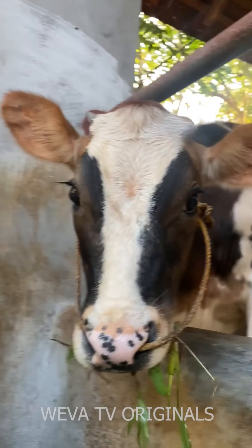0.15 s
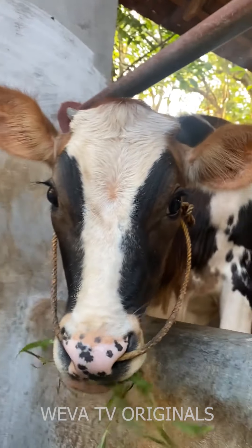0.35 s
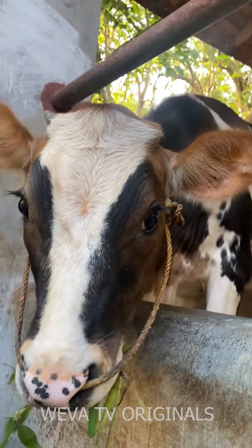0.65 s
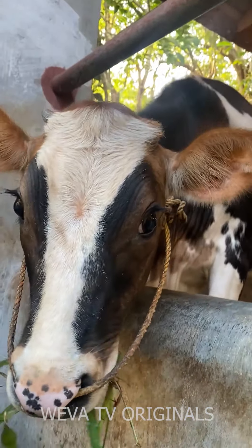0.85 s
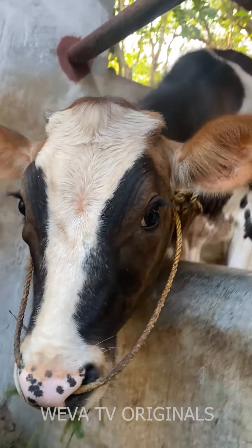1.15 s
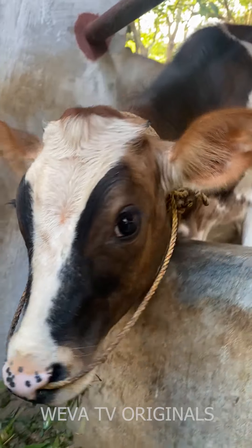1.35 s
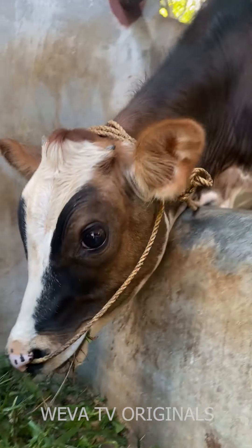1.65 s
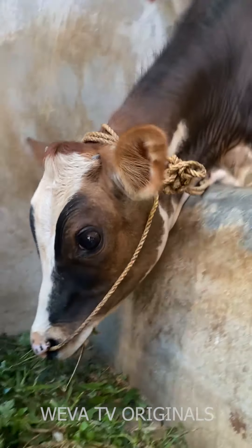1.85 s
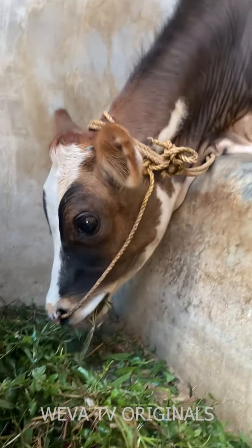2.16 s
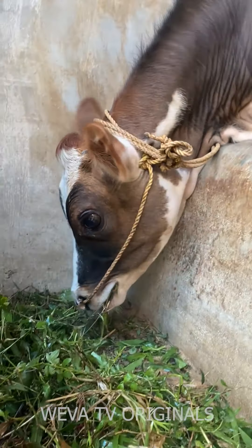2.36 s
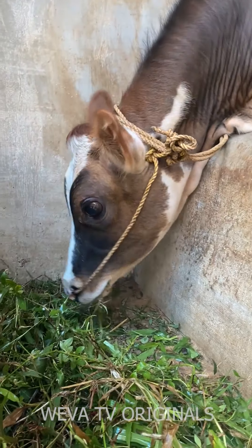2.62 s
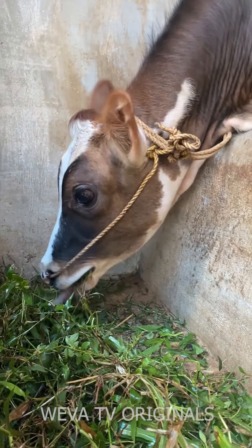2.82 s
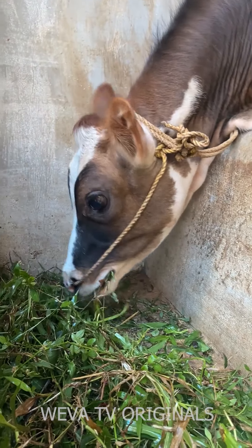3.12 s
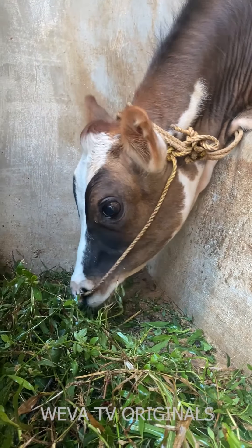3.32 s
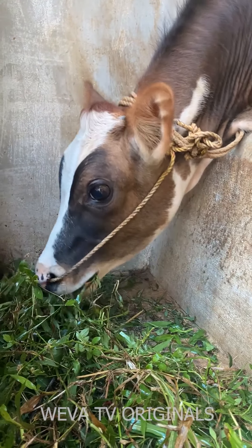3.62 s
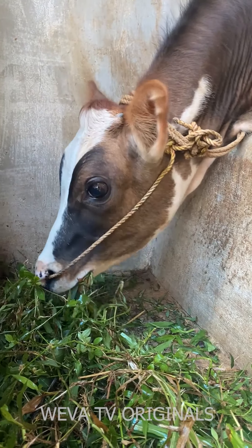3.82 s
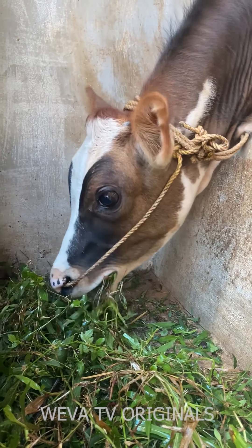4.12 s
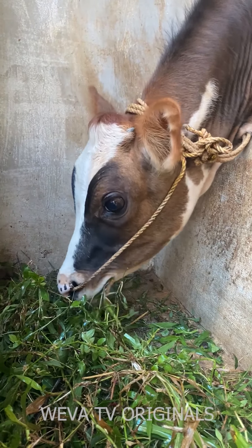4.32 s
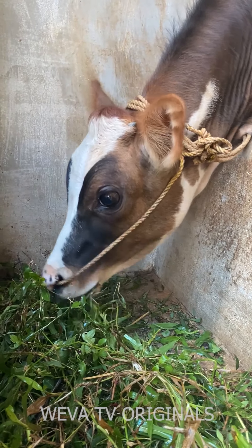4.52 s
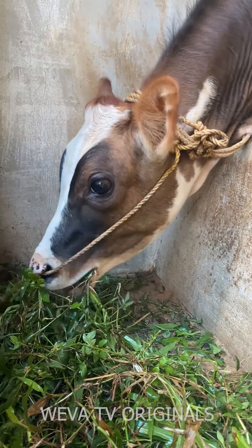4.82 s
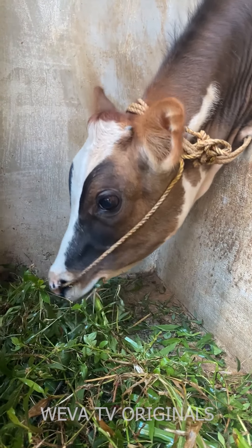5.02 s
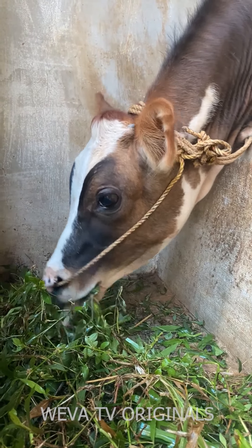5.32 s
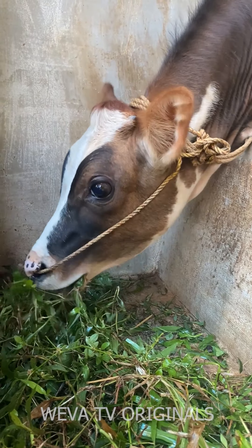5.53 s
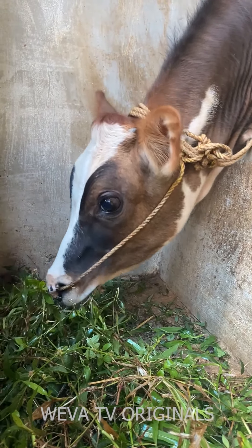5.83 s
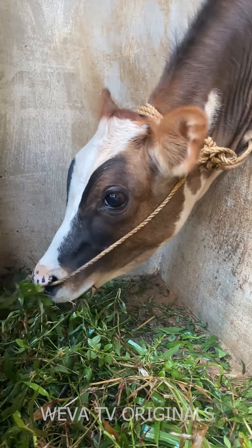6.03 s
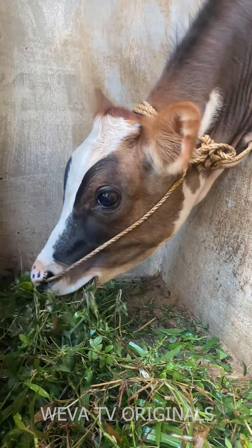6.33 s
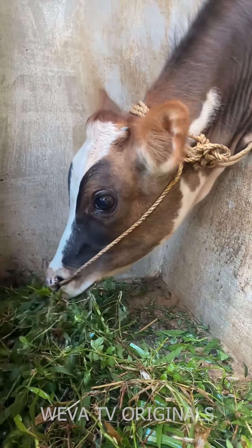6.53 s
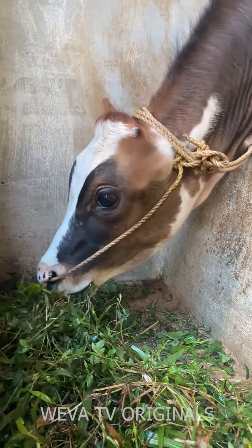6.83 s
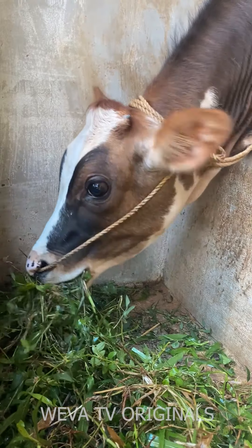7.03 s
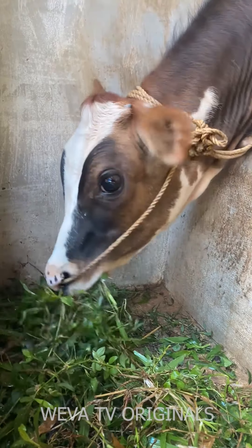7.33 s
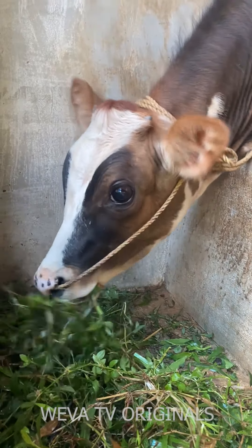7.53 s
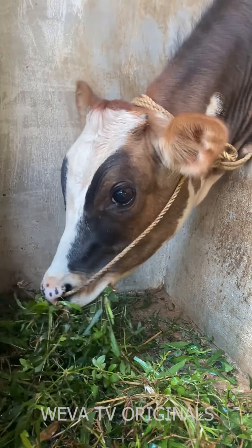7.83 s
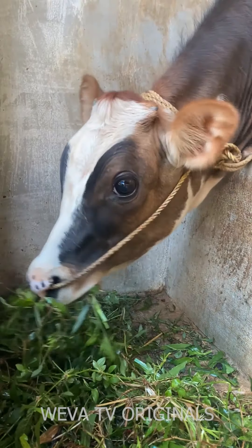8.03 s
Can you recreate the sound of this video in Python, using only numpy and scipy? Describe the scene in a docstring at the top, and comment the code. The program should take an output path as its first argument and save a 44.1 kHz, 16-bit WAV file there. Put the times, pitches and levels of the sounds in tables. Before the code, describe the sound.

A calf chews and tears fresh grass close by, rasping and crunching with small crackles over a low rumble that swells and fades.

```python
"""A calf grazing in a shed

A calf chews and tears fresh grass in a concrete corner. Breaking fibres excite the resonances of
its mouth and the trough, stalks snap, jaw and tongue knock, wet blades squeak and leaves rustle.
A far engine drones over a low rumble, swelling and fading; now and then something whistles faintly."""
import sys
import numpy as np
from scipy import signal
from scipy.fft import rfft, irfft
from scipy.io import wavfile
from scipy.ndimage import uniform_filter1d

SR = 44100
rng = np.random.default_rng(int(sys.argv[2]) if len(sys.argv) > 2 else 0)


def file_out(sig):
    """Save sig as 16-bit WAV at sys.argv[1]."""
    # one column per channel
    cols = np.atleast_2d(sig).T
    # limit, then scale
    lim = np.clip(cols, -1, 1)
    pcm = np.round(lim * 32767).astype(np.int16)
    wavfile.write(sys.argv[1], SR, pcm)


N = 359856
TIME = np.arange(N) / SR

# strokes of the jaw (start [s], length [s], grinding level [dB], tearing level [dB])
JAW_STROKES = [(0, 0.078, -39, -49.5), (0.08, 0.057, -44.5, -52), (0.372, 0.15, -54, -62),
               (0.597, 0.13, -42.5, -49), (0.956, 0.23, -52, -53.5), (1.189, 0.18, -49.5, -49),
               (1.42, 0.22, -51, -54), (1.711, 0.015, -39, -52), (1.764, 0.13, -41, -51),
               (2.007, 0.3, -45.5, -57.5), (2.292, 0.054, -38.5, -66), (2.389, 0.15, -44, -51.5),
               (2.571, 0.08, -47.5, -54), (2.707, 0.055, -51, -59), (2.784, 0.05, -42.5, -64),
               (2.979, 0.16, -45.5, -52), (3.176, 0.15, -42.5, -49.5), (3.393, 0.077, -44.5, -54),
               (3.526, 0.24, -57.5, -62), (3.693, .2, -55, -57), (3.98, 0.051, -57, -54),
               (4.078, 0.11, -48.5, -52), (4.227, 0.22, -38.5, -50.5), (4.487, 0.046, -46, -47.5),
               (4.571, 0.049, -47.5, -51.5), (4.688, 0.16, -45, -56.5), (4.975, 0.17, -41, -53.5),
               (5.243, 0.087, -45, -56), (5.287, 0.062, -44, -66), (5.413, 0.07, -47.5, -65),
               (5.518, 0.17, -56, -61), (5.763, 0.059, -50.5, -78), (5.88, 0.1, -52.5, -56),
               (5.983, 0.26, -55, -55), (6.248, 0.25, -47.5, -50), (6.495, 0.093, -48, -56),
               (6.664, 0.48, -51, -51), (7.177, 0.13, -48.5, -47.5), (7.454, 0.16, -54.5, -52),
               (7.617, 0.17, -47.5, -51), (7.82, 0.15, -46, -49), (8.101, 0.082, -47, -43)]
# spectrum of tearing grass (frequency [Hz], level [dB])
TEAR_SPECTRUM = [(250, -23), (700, -1), (1000, 4), (1350, 1.5), (1900, -0.5), (2500, -0.5), (3300, -2.5),
                 (4300, -5), (6000, -2.5), (9000, -29.5), (15000, -36)]

def chewing(grind_db=-2.34, tear_db=-1.5):
    """Fracture noise: fibres break in clumps under each stroke, ground in the jaws and torn apart."""
    clumps = wander(hz=43.3)
    shared_breaks = fibres(per_s=260, spread_db=2.0)
    crushed = (fibres(per_s=2000, spread_db=1.5) + 0.25 * shared_breaks) * amp(0.84 * clumps)
    torn = (fibres(per_s=2600, spread_db=2.5) + 0.5 * shared_breaks) * amp(1.9 * clumps)
    shape = dict(attack_s=0.018, swell_db=3.5, release_db_per_s=237)
    grinding = strokes([(s, length_s, db) for s, length_s, db, _ in JAW_STROKES], **shape, rest_db=-60.5)
    tearing = strokes([(s, length_s, db) for s, length_s, _, db in JAW_STROKES], **shape, rest_db=-63)
    grind = amp(grind_db) * grinding * cavities(crushed)
    tear = amp(tear_db) * tearing * unit(colour(torn, TEAR_SPECTRUM))
    return grind + tear


# fixed modes of mouth and trough (frequency [Hz], bandwidth [Hz], gain [dB])
CAVITY_MODES = [(330, 16.4, 7.5), (422, 170, -8.5), (494.4, 8.7, 3), (551, 21, -1), (599, 8.5, 3),
                (638, 10.5, 3), (860, 350, -12), (1260, 32, -36)]
# resonance of the mouth as the jaw moves (time [s], frequency [Hz])
MOUTH_RESONANCE = [(.07, 403), (.5, 547), (.72, 447), (1.0, 318), (1.75, 398), (1.9, 390), (2.12, 460),
                   (2.3, 564), (2.37, 417), (2.52, 367), (2.82, 506), (3.2, 487), (3.42, 594), (4.3, 380),
                   (4.45, 420), (4.75, 580), (5.05, 453), (5.28, 510), (5.45, 344), (6.4, 373), (7.25, 520),
                   (8.16, 486)]
# spectrum of dull grinding (frequency [Hz], level [dB])
GRIND_SPECTRUM = [(100, -37), (200, 1), (330, -1), (600, 4.5), (760, -9), (1300, -1), (2500, -75.5)]

def cavities(crushed, dull=0.72, mouth=0.52, width_hz=297):
    """Cavity resonance: the crunch excites fixed modes and one that follows the opening of the jaw."""
    ring = sum(amp(db) * mode(crushed, hz, width) for hz, width, db in CAVITY_MODES)
    mouth_hz = curve(MOUTH_RESONANCE)
    formant = resonate(resonate(crushed, mouth_hz, width_hz), mouth_hz, width_hz)
    return unit(unit(ring) + dull * unit(colour(crushed, GRIND_SPECTRUM)) + mouth * unit(formant))


# breaking stalks (time [s], level [dB], relative body [dB], relative edge [dB], ring frequency [Hz])
STALK_SNAPS = [(0.0187, -29, -18, -12, 1410), (.043, -32, -19, -22, 1260), (0.068, -33.5, 2.5, -22, 960),
               (0.114, -26, -24, -1.5, 1380), (.14, -23, -12.5, -12.5, 980), (.495, -38, 5.5, -24, 1390),
               (0.601, -32.5, -24, -20, 1730), (0.636, -32.5, -34, -20, 1350),
               (0.656, -30.5, -29, -19, 1400), (.752, -24.5, -17, -14, 1170), (0.8041, -21, -8, -18, 2180),
               (1.0045, -31, -5, -14, 5600), (1.0905, -34, -28, -25, 2310), (1.2434, -29.5, -3, -5.5, 1250),
               (1.2891, -18, -9.5, -16, 1040), (1.322, -35, -3, 8, 5600), (1.624, -31, -32, -12, 1230),
               (1.732, -35, -24, -19, 1310), (1.886, -29, -19, -16, 2380), (1.994, -45.5, -10, 5.5, 5500),
               (2.129, -36, -2, -22, 2190), (2.17, -34, -11, -24, 2140), (2.24, -31, -11, -9, 1200),
               (2.338, -32, -7, -16, 1200), (2.5, -31, 0, -26, 1520), (2.518, -24, -8, -18, 2600),
               (2.7332, -33, -12, -20, 1160), (3.0076, -34, -11, -7, 1200), (3.222, -30.5, -7, -16, 3500),
               (3.258, -28.5, -7, -19, 3400), (3.3009, -20, -9.5, -12, 4280), (3.3065, -27, -9, -19, 3930),
               (3.338, -30, -10, -12, 4400), (3.8053, -47, -15, 2, 5400), (4.278, -28, -4.5, -28, 4200),
               (4.2946, -26.5, -5, -24, 4140), (4.316, -30, 1.5, -22, 4370), (4.3365, -25, -3, -17, 3600),
               (4.346, -27, -13, -18, 1500), (4.375, -21, -11, -7.5, 4350), (4.407, -24, -9, -22, 4200),
               (4.415, -22.5, -8, -7, 4250), (4.4188, -28, -8, -27, 1500), (4.627, -36, -14, -18, 1000),
               (5.023, -33, -4, -24, 1010), (5.0451, -26.5, -9, -26, 4100), (5.0795, -27.5, -9, -12, 2200),
               (5.092, -35, 3, -20, 2600), (5.111, -27.5, -9, -13, 4760), (5.145, -40, 0, -22, 900),
               (5.165, -39, 6, -5, 800), (5.373, -43, -6, -24, 950), (4.5102, -34.5, 4, -13, 1900),
               (5.685, -30.5, -6, -11, 3950), (6.011, -31, -25, -20, 980), (6.4507, -28.5, -19, -14, 1510),
               (6.5803, -31.5, -2, -19, 2560), (7.006, -38.5, -6, 9, 5470), (7.1237, -45, -20, 13.5, 5400),
               (7.253, -23.5, -6.5, -22, 1560), (7.3036, -24.5, -9, -14, 1820),
               (7.428, -30, -24, -17, 1470), (7.514, -45, -13, 11.5, 5400), (7.9495, -17.5, -12, -15, 2380),
               (7.9549, -20.5, -5, -14, 1150)]
# spectra of the crack and of its hollow body (frequency [Hz], level [dB])
CRACK_SPECTRUM = [(200, -32.5), (800, 5.5), (1150, 13), (1600, 3.5), (2400, -3.5), (3200, -1), (4000, 2),
                  (4800, -3), (6000, -2.5), (7500, 3.5), (10000, -45), (15000, -40)]
BODY_SPECTRUM = [(100, -54), (220, 0.5), (350, 4.5), (600, 6), (780, -3), (1300, 1.5), (2500, -52)]

def snaps(split_s=0.004, width_hz=950, crack_db=9.5, stalk_db=4.5, body_db=17, edge_db=16):
    """Brittle fracture: a crack and its splinters ring the stalk, with a hollow body and crisp edge."""
    crack, stalk, body, edge = np.zeros((4, N))
    for s, db, body_rel_db, edge_rel_db, hz in STALK_SNAPS:
        splinters = scatter(split_s)
        splinters *= rng.random(len(splinters)) < 0.17  # thinned to a sparse run
        splinters /= np.linalg.norm(splinters)
        splinters[0] = 0.25  # the first crack
        ring = mode(mode(splinters, hz, width_hz), hz, width_hz)
        add(crack, s, splinters * amp(db))
        add(stalk, s, ring / np.linalg.norm(ring) * amp(db + stalk_db))
        add(body, s, splinters * amp(db + body_rel_db))
        add(edge, s, splinters * amp(db + edge_rel_db))
    return (amp(crack_db) * colour(crack, CRACK_SPECTRUM) + stalk
            + amp(body_db) * colour(body, BODY_SPECTRUM)
            + amp(edge_db) * colour(edge, RUSTLE_SPECTRUM))


# knocks of jaw and tongue (time [s], level [dB], frequency [Hz])
JAW_KNOCKS = [(.069, -21, 344), (.125, -25, 254), (.496, -28, 550), (.69, -33, 331), (.804, -33.5, 487),
              (.985, -27, 270), (1.721, -22.5, 434), (1.726, -26.5, 328), (1.788, -21.5, 383),
              (1.885, -32, 425), (2.127, -40, 530), (2.2965, -21.5, 611), (2.308, -21.5, 558),
              (2.345, -27, 427), (2.501, -23.5, 322), (2.808, -27.5, 581), (2.835, -35, 480),
              (3.303, -22, 632), (3.437, -26, 610), (4.316, -24.5, 330), (4.325, -23, 435),
              (4.34, -44, 710), (4.395, -21, 324), (4.722, -29, 496), (4.73, -29, 893), (4.773, -27, 506),
              (5.002, -25.5, 331), (5.255, -24.5, 510), (5.268, -26.5, 576), (5.28, -25, 436),
              (6.012, -28.5, 611), (7.251, -28, 643)]

def knocks():
    """Impact excitation: each knock of jaw or tongue rings one hollow, damped mode."""
    return damped_tones(JAW_KNOCKS, rise_s=0.0062, gain_db=-14)


# sliding blades (start [s], level [dB], top frequency [Hz], length [s], bandwidth [Hz])
BLADE_SQUEAKS = [(.018, -42.5, 1370, 0.0094, 393), (.905, -60, 3300, 0.045, 2510),
                 (1.003, -52.5, 5050, 0.034, 2500), (1.08, -51.5, 2200, 0.059, 1100),
                 (1.301, -41.5, 3255, 0.013, 170), (2.1, -63, 2200, 0.2, 1300),
                 (4.1, -57, 2360, 0.065, 1300), (4.23, -59, 4300, 0.18, 700)]

def squeaks():
    """Stick-slip friction: wet blades slide in tiny jerks that drive a resonance."""
    slips = fibres(per_s=1200, spread_db=6.0)
    return glides(BLADE_SQUEAKS, slips, bend=0.026, gain_db=2)


# nudges of the muzzle (start [s], length [s], level [dB])
MUZZLE_NUDGES = [(0.27, 0.058, -52.5), (.41, 0.11, -55.5), (0.615, 0.13, -56), (.89, 0.038, -54),
                 (0.995, 0.016, -48), (1.13, 0.097, -56), (1.228, 0.087, -45.5), (1.42, 0.12, -64),
                 (1.572, 0.084, -55), (1.761, 0.15, -55.5), (2.064, 0.19, -55), (2.21, 0.039, -49.5),
                 (2.362, 0.17, -52), (2.696, 0.27, -55), (2.995, 0.24, -48), (3.42, .04, -51),
                 (3.472, 0.12, -44), (3.612, 0.25, -44.5), (3.963, 0.062, -49), (4.084, 0.062, -41),
                 (4.206, 0.22, -50), (4.485, 0.03, -46.5), (4.59, 0.15, -46), (4.868, 0.053, -49),
                 (5.009, 0.09, -49), (5.3, 0.094, -51), (5.418, 0.074, -42.5), (5.582, 0.13, -45),
                 (5.91, 0.042, -48.5), (6.018, 0.29, -43.5), (6.327, 0.27, -44), (6.675, 0.21, -46),
                 (6.887, 0.15, -40.5), (7.203, 0.31, -46.5), (7.461, 0.038, -42.5), (7.547, 0.077, -40),
                 (7.721, 0.22, -47), (8.051, 0.11, -46)]
# spectrum of rustling leaves and of a snap's crisp edge (frequency [Hz], level [dB])
RUSTLE_SPECTRUM = [(600, -25), (2000, -9), (4000, -3.5), (5700, 0), (8500, 0), (10500, -1.5), (13000, -2.5),
                   (15000, -3)]

def leaves(gain_db=-4.5, flicker_db=1.34):
    """Friction noise: nudged leaves scrape on each other, heard from the front and from around."""
    nudging = strokes(MUZZLE_NUDGES, attack_s=0.009, swell_db=4.5, release_db_per_s=129, rest_db=-64)
    level = nudging * amp(gain_db + flicker_db * wander(hz=45))
    scrapes = [colour(fibres(per_s=4000, spread_db=1.0), RUSTLE_SPECTRUM) for _ in range(2)]
    return [level * leaf_patches(x) for x in scrapes]


def leaf_patches(x, depth_db=3.0, size=512):
    """Spectral modulation: different leaves sound in turn, as brief patches of colour."""
    frames = dict(nperseg=size, noverlap=size * 3 // 4)
    spectra = signal.stft(x, **frames)[2]
    patches = uniform_filter1d(rng.standard_normal(spectra.shape), size=9, axis=0)  # across frequency
    patches = uniform_filter1d(patches, size=12, axis=1)  # across time
    return unit(signal.istft(spectra * amp(depth_db * unit(patches)), **frames)[1][:N])


# soft low bumps (time [s], level [dB], frequency [Hz])
LOW_BUMPS = [(.825, -12, 81), (1.505, -17, 86.4), (1.72, -12, 94), (4.485, -11.5, 116.5),
             (4.835, -13.5, 158), (4.851, -7.5, 111), (5.47, -14, 110)]

def bumps():
    """Damped oscillation: low tones with a gentle onset, heard as soft bumps."""
    return damped_tones(LOW_BUMPS, rise_s=0.013, gain_db=-20.5)


# faint whistles (start [s], level [dB], top frequency [Hz], length [s], bandwidth [Hz])
FAINT_WHISTLES = [(.24, -56.5, 1420, 0.42, 550), (.85, -56, 1470, 0.36, 190), (2.28, -56, 1450, 0.37, 170),
                  (2.78, -61.5, 1503, 0.32, 50), (3.39, -56, 1433, .26, 70), (4.06, -55.5, 1490, 0.22, 120),
                  (4.62, -57, 1590, 0.3, 149), (5.79, -58.5, 1468, 0.235, 45), (6.33, -58, 1540, 0.31, 185),
                  (7.53, -64, 1740, 0.3, 260)]

def whistles():
    """Narrow-band noise: a gliding resonance turns hiss into a hoarse whistle."""
    return glides(FAINT_WHISTLES, rng.standard_normal(N), bend=0.14, gain_db=-2.8)


# the engine speeds up, then slows (time [s], firing rate [Hz])
FIRING_RATE = [(0, 15.2), (.9, 15.4), (1.7, 16.1), (2.3, 16.4), (2.7, 16.25), (3.4, 16.4), (3.8, 16.8),
               (4.7, 16.75), (5.5, 16.55), (5.9, 16.45), (6.25, 15.6), (6.6, 15.3), (7.0, 14.8),
               (7.5, 14.3), (8.16, 14.1)]
# swells of its partials (crest time [s], Gaussian width [s], multiple of firing rate [1], level [dB])
ENGINE_PARTIALS = [(1.8, 1.5, 2.5, -51), (5.6, 0.34, 3, -48), (4.7, .5, 4, -52), (8.4, 0.31, 4, -49),
                   (0.63, 0.89, 5, -49.5), (4.65, 0.82, 5, -42), (6.02, 1.67, 5, -44.5),
                   (0.89, 0.19, 6, -42.5), (1.67, 0.54, 6, -44.5), (5.2, 0.48, 7, -50.5),
                   (6.73, 0.47, 7, -43), (3.08, 0.65, 8, -48), (5.02, 0.89, 8, -41.5), (6.38, 0.58, 8, -44),
                   (4.2, 0.61, 10, -49), (5.02, 0.22, 11, -48)]

def engine(waver=0.0043, flutter_db=1.0):
    """Periodic excitation: a far engine drones at multiples of its firing rate, which swell in turn."""
    firings = np.cumsum(curve(FIRING_RATE) * (1 + waver * wander(hz=5.6))) / SR
    out = np.zeros(N)
    for s, width_s, multiple, db in ENGINE_PARTIALS:
        swell = amp(db) * np.exp(-((TIME - s) / width_s) ** 2 / 2)
        out += swell * np.sin(2 * np.pi * multiple * firings + rng.uniform(0, 2 * np.pi))
    return out * amp(flutter_db * wander(hz=2.6))


# swell of far traffic (time [s], level [dB])
TRAFFIC_LEVEL = [(0.0, -46.5), (0.2, -47), (0.5, -47.5), (0.82, -46), (1.61, -46.5), (1.75, -39.5),
                 (1.95, -51.5), (2.11, -43), (2.7, -45), (3.43, -46.5), (4.41, -42), (4.52, -36),
                 (4.57, -41), (4.84, -40.5), (5.29, -46.5), (6.3, -46), (7.11, -45), (7.18, -49.5),
                 (8.16, -45)]
# spectra of the traffic and of the deep bed (frequency [Hz], level [dB])
TRAFFIC_SPECTRUM = [(25, -15.5), (45, -16), (62, -0.5), (82, 0.5), (105, 0), (135, -2), (155, -11),
                    (185, -8), (220, -17.5), (300, -33), (600, -49), (3000, -93)]
DEEP_SPECTRUM = [(12, -36), (25, -8), (36, -6), (48, 3.5), (62, -12.5), (100, -16.5), (300, -41),
                 (2000, -90)]

def rumble(deep_db=-55):
    """Low-frequency noise: the roar of far traffic rises and falls over a steady deep bed."""
    roar = unit(colour(rng.standard_normal(N), TRAFFIC_SPECTRUM, size=16384))
    deep = unit(colour(rng.standard_normal(N), DEEP_SPECTRUM, size=16384))
    return roar * amp(curve(TRAFFIC_LEVEL)) + deep * amp(deep_db)


# spectrum of the yard's air (frequency [Hz], level [dB])
AIR_SPECTRUM = [(60, 6.5), (300, 6.5), (600, 3.5), (1300, 2.5), (2200, -3.5), (5000, -10.5), (15000, -25)]

def air(level_db=-62):
    """Ambient noise: the steady, quiet hiss of the yard."""
    return amp(level_db) * unit(colour(rng.standard_normal(N), AIR_SPECTRUM))


def walls(x, corner_s=0.0059, tail_s=0.052, tail=0.51, size=4096):
    """Diffuse reverberation: early reflections off concrete and a short tail, varying at random."""
    out, window = np.zeros(N), signal.windows.cosine(size)
    for start in range(0, N, size // 2):
        piece = x[start:start + size]
        taps = scatter(corner_s) + tail * scatter(tail_s)
        add(out, start / SR, signal.fftconvolve(piece * window[:len(piece)], taps / np.linalg.norm(taps)))
    return out


# likeness of the two microphone ports (frequency [Hz], coherence [0-1])
PORT_COHERENCE = [(100, .999), (300, .98), (550, .9), (850, .4), (1200, .5), (1800, .82), (2800, .55),
                  (4200, .72), (7500, .86), (8700, .98), (11000, .98), (12300, .76), (15000, .72)]
# tilt toward the right port (frequency [Hz], right boost and left cut [dB])
PORT_TILT = [(100, 0), (250, .7), (500, 1.35), (2000, .95), (4500, .25), (8000, .05)]

def ports(front, around, lag_s=2.2 / SR):
    """Partial coherence: frontal sound reaches the left port first; diffuse sound makes them differ."""
    hz = np.fft.rfftfreq(N, 1 / SR)
    coherence = np.clip(read(PORT_COHERENCE, hz), 0, 1)
    common = rfft(front) * np.sqrt((1 + coherence) / 2)
    apart = rfft(around) * np.sqrt((1 - coherence) / 2)
    tilt = amp(read(PORT_TILT, hz))
    left = (common + apart) / tilt
    right = (common - apart) * tilt * np.exp(-2j * np.pi * hz * lag_s)
    return irfft(np.array([left, right]), N)


def fibres(per_s, spread_db):
    """Poisson process: tiny impulses at random times, many small and a few large."""
    out, at = np.zeros(N), np.flatnonzero(rng.random(N) < per_s / SR)
    size_db = spread_db * np.minimum(rng.exponential(1, N)[at], 4)
    out[at] = amp(size_db) * rng.choice([-1, 1], N)[at]
    return unit(out)


def strokes(rows, attack_s, swell_db, release_db_per_s, rest_db):
    """Power summation: each stroke sets in, swells to its end and dies away to a faint stirring."""
    power, t = np.zeros(N), np.arange(SR) / SR
    for s, length_s, db in rows:
        rise_db = swell_db * (np.minimum(t / length_s, 1) - 1)
        fall_db = release_db_per_s * np.maximum(t - length_s, 0)
        add(power, s, (np.minimum(t / attack_s, 1) * amp(db + rise_db - fall_db)) ** 2)
    return np.sqrt(power + amp(rest_db) ** 2)


def damped_tones(rows, rise_s, gain_db):
    """Damped sinusoids: each swells for rise_s and dies away."""
    out, t = np.zeros(N), np.arange(SR // 4) / SR
    envelope = t / rise_s * np.exp(1 - t / rise_s)
    for s, db, hz in rows:
        add(out, s, amp(db + gain_db) * envelope * np.sin(2 * np.pi * hz * t))
    return out


def glides(rows, drive, bend, gain_db):
    """Forced resonance with a pitch that rises and falls: narrow for a tone, wide for a rasp."""
    out = np.zeros(N)
    for s, db, hz, length_s, width_hz in rows:
        piece = drive[max(round(s * SR), 0):][:int(length_s * SR)]
        position = np.linspace(-1, 1, len(piece))
        pitch = hz * (1 - bend * position ** 2)
        tone = resonate(resonate(piece, pitch, width_hz), pitch, width_hz)
        add(out, s, amp(db + gain_db) * unit(tone * np.sqrt(1 - position ** 2)))
    return out


def mode(x, hz, width_hz):
    """A fixed resonance of gain 1."""
    r = np.exp(-np.pi * width_hz / SR)
    return 2 * signal.lfilter([1 - r], [1, -r * np.exp(2j * np.pi * hz / SR)], x).real


def resonate(x, hz, width_hz):
    """A resonance of gain 1 that follows a pitch curve."""
    phasor = np.exp(2j * np.pi * np.cumsum(hz * np.ones(len(x))) / SR)
    r = np.exp(-np.pi * width_hz / SR)
    return 2 * (phasor * signal.lfilter([1 - r], [1, -r], x / phasor + 1e-18)).real


def colour(x, spectrum, size=4096):
    """Minimum-phase filter of unit energy with the given spectrum."""
    log_gain = np.log(amp(read(spectrum, abs(np.fft.fftfreq(size, 1 / SR)))))
    taps = np.fft.ifft(np.exp(np.conj(signal.hilbert(log_gain)))).real[:size // 2]
    return signal.oaconvolve(x, taps / np.linalg.norm(taps))[:len(x)]


def scatter(decay_s, size=8192):
    """Exponentially decaying noise of energy 1."""
    taps = rng.standard_normal(size) * np.exp(-np.arange(size) / SR / decay_s)
    return taps / np.linalg.norm(taps)


def wander(hz):
    """Random fluctuation of rms 1, low-passed near hz."""
    f = np.fft.rfftfreq(N, 1 / SR)
    return unit(irfft(rfft(rng.standard_normal(N)) * np.exp(-(f / hz) ** 2), N))


def curve(rows):
    """Linear interpolation of (time, value) rows at every sample."""
    return np.interp(TIME, *np.transpose(rows))


def read(spectrum, hz):
    """Interpolation of a spectrum over log frequency."""
    f, value = np.transpose(spectrum)
    return np.interp(np.log(hz + 1), np.log(f + 1), value)


def add(mix, s, sound):
    """Superposition of a sound, starting at s seconds."""
    part = mix[max(round(s * SR), 0):][:len(sound)]
    part += sound[:len(part)]


def amp(db):
    """Decibels to amplitude."""
    return 10 ** (np.asarray(db) / 20)


def unit(x):
    """Normalisation to rms 1."""
    return x / np.sqrt(np.mean(x ** 2) + 1e-20)


def scene(grass_wet=0.89, snap_wet=0.4):
    """Direct and diffuse fields: the calf and its reflections add to the background of the yard."""
    squeaking, whistling = squeaks(), whistles()
    grass = chewing() + squeaking
    cracks = snaps()
    tones = knocks() + whistling
    hiss_front, hiss_around = [rustle + air() for rustle in leaves()]
    low = rumble() + engine() + bumps()
    reflections = walls(grass_wet * grass + snap_wet * cracks)
    near = (grass + cracks + reflections) / np.hypot(1, grass_wet)
    return ports(front=near + tones + low + hiss_front,
                 around=walls(grass + cracks + tones) + hiss_around)


def record(dry, cutoff_hz=15550):
    """Band limiting: a steep low-pass removes the highest treble."""
    taps = signal.firwin(511, cutoff_hz, window=("kaiser", 9), fs=SR)
    return signal.oaconvolve(dry, taps[None], "same")


dry = scene()
out = record(dry)
file_out(out)
```